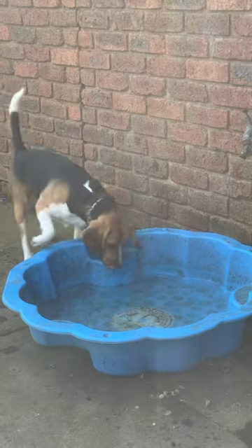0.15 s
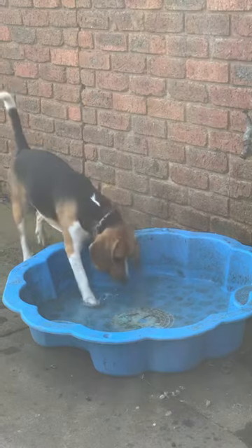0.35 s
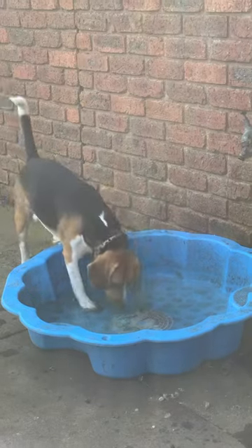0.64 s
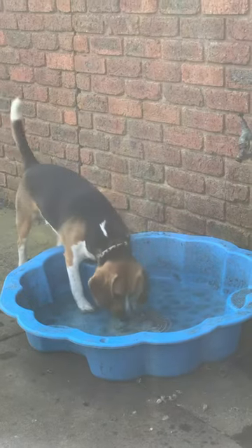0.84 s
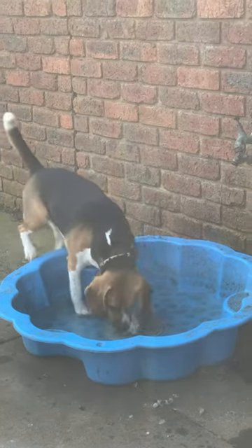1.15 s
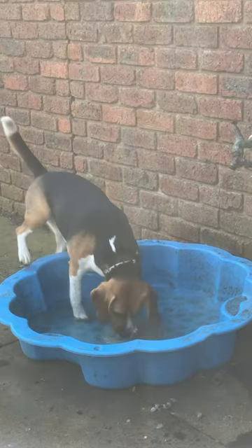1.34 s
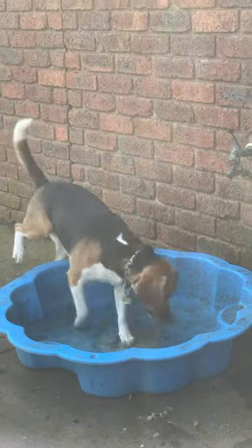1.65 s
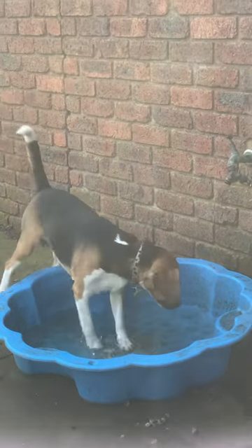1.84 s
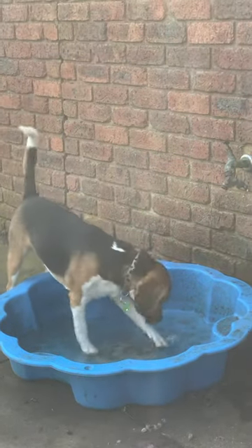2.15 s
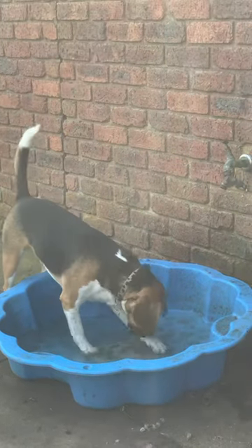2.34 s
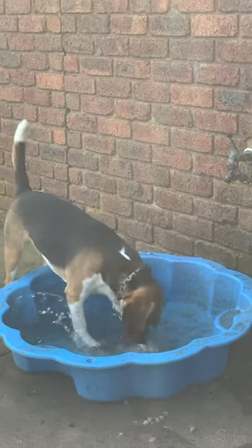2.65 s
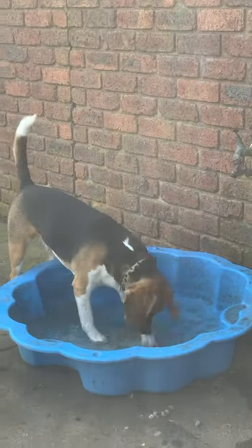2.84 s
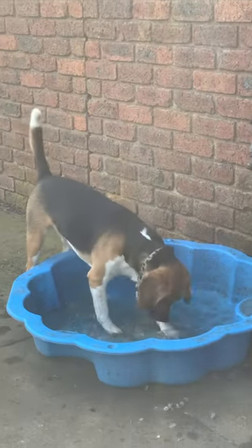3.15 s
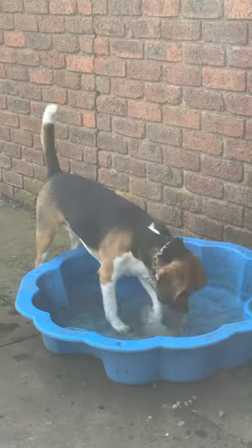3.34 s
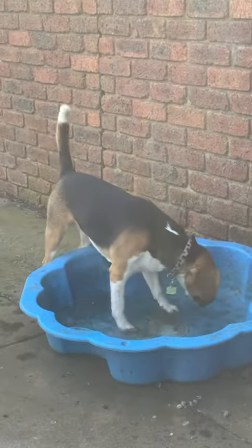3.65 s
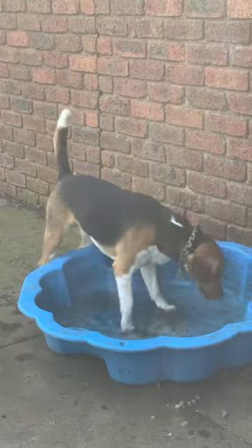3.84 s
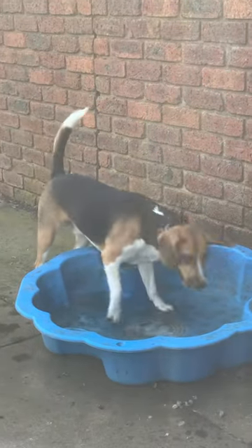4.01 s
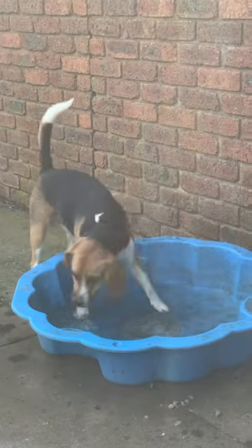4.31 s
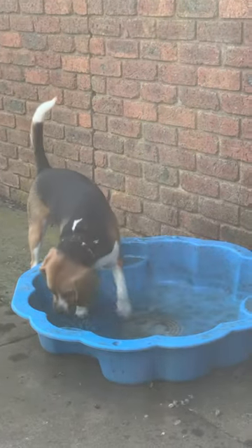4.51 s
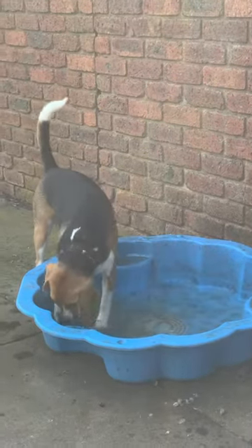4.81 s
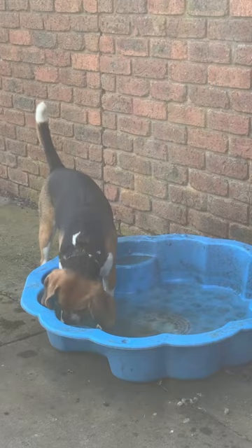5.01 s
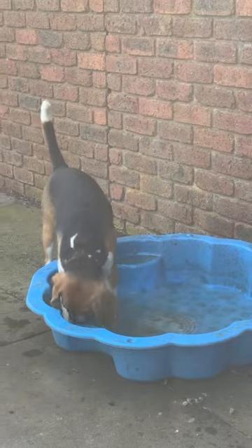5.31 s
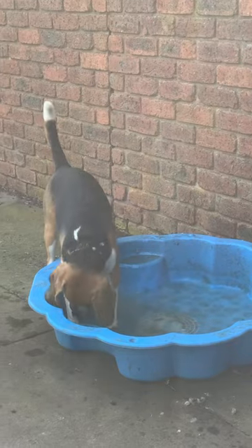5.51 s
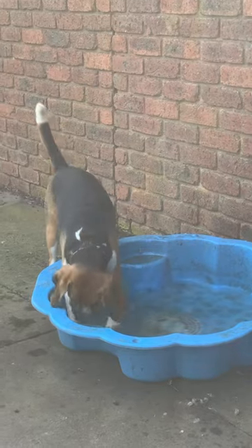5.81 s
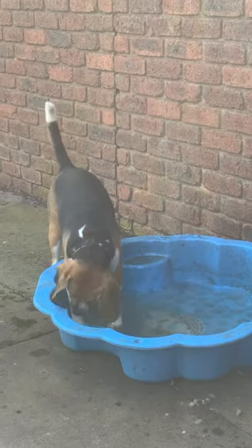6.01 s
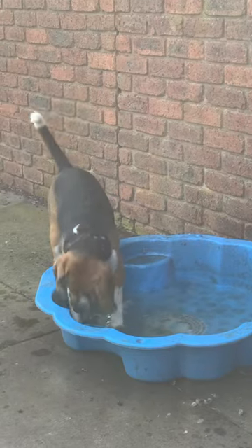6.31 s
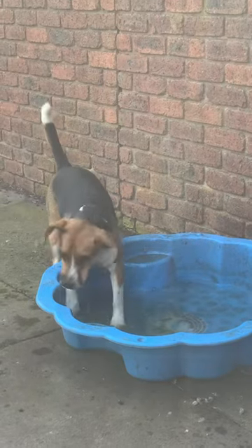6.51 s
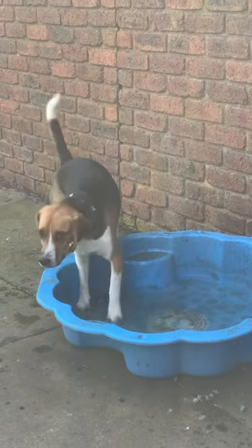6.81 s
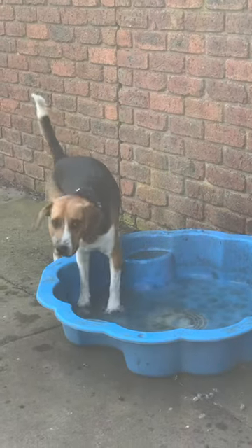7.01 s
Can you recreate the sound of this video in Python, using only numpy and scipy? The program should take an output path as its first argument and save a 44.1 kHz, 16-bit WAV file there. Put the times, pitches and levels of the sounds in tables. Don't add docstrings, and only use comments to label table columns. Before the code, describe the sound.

Irregular splashing in shallow water, heard close on a phone outdoors. At first only padded thumps on a hollow plastic floor and light ripples, then crisp paw slaps, the hardest near two and a half seconds. Busy sloshing, falling drops and bubble pops follow with brief lulls, then lower churning as the muzzle and paws work the water. A last splash fades into trickles over quiet garden rumble.

```python
import sys
import numpy as np
from scipy import signal
from scipy.fft import rfft, irfft, next_fast_len
from scipy.io import wavfile
from scipy.ndimage import uniform_filter1d, map_coordinates

SR = 44100
rng = np.random.default_rng(int(sys.argv[2]) if len(sys.argv) > 2 else 0)


def boost(x):
    u = np.asarray(x, float) / 20
    return 10 ** u


def transcribe(u):
    v = np.clip(np.atleast_2d(u).T, -1, 1)
    q = np.round(v * 32767).astype(np.int16)
    wavfile.write(sys.argv[1], SR, q)


N = 315756

# time_s, level_db
POOL_STIR = [(0, -76), (.3, -92), (.55, -82), (.88, -90), (1.15, -84), (1.36, -83), (1.75, -70),
             (2.04, -78), (2.6, -62), (2.8, -61), (3.6, -56.5), (3.8, -82), (4.2, -64.5), (4.4, -86),
             (4.6, -66), (5.4, -56), (6.4, -55.5), (7.16, -72.5)]


def unit(x):
    return x / np.sqrt(np.mean(x ** 2) + 1e-20)


def along(points, hz):
    point_hz, value = np.transpose(points)
    return np.interp(np.log(hz + 1), np.log(point_hz + 1), value)


def over_time(points):
    return np.interp(np.arange(N) / SR, *np.transpose(points))


def wobble(rate):
    knots = rng.standard_normal(int(N * rate / SR) + 4)
    return map_coordinates(knots, [np.arange(N) * rate / SR])


def filtered(x, response):
    size = next_fast_len(N + 8192)
    return irfft(rfft(x, size) * response(np.fft.rfftfreq(size, 1 / SR)), size)[..., :N]


def coloured_noise(spectrum):
    return unit(filtered(rng.standard_normal(N), lambda f: boost(along(spectrum, f))))


def modes(table):
    def response(f):
        total = 0
        for k, (hz, width, db) in enumerate(table):
            total = total + (-1) ** k * boost(db) * 1j * f * width / (hz * hz - f * f + 1j * f * width)
        return total
    return response


def bursts(times, levels_db, t60s, rise):
    power, t = np.zeros(N + SR), np.arange(SR // 2) / SR
    for s, db, t60 in zip(times, levels_db, t60s):
        shape = boost(db - 60 * t / max(t60, .004)) * (1 - np.exp(-t / rise))
        power[round(s * SR):][:len(t)] += shape ** 2
    return np.sqrt(power[:N])


def patchy(x, depth_db):
    z = signal.stft(x, nperseg=256)[2]
    field = uniform_filter1d(rng.standard_normal(z.shape), size=4, axis=0)
    field = uniform_filter1d(field, size=7, axis=1)
    return signal.istft(z * boost(depth_db * unit(field) - 0.24), nperseg=256)[1][:N]


def droplets(spectrum, centre_hz, cycles, scatter_db, share, count):
    when, pitch = rng.random(count), rng.standard_normal(count)
    size = np.minimum(rng.exponential(size=count), 2.8)
    hz = np.clip(centre_hz * np.exp(.33 * pitch), 200, 15000)[:, None]
    k = np.arange(min(int(2.5 * cycles * SR / centre_hz), 600))
    age = k * hz / (SR * cycles)
    ring = np.sin(2 * np.pi * cycles * (age + 0.0428 * age ** 2))
    ring *= np.exp(-2 * age) * (1 - np.exp(-8 * age))
    at = (when * N).astype(int)[:, None] + k
    grains = np.bincount(at.ravel(), (ring * boost(scatter_db * size)[:, None]).ravel(), N + 800)[:N]
    grains = unit(filtered(grains, lambda f: boost(along(spectrum, f))))
    share = np.clip(share, 0, 1)
    return np.sqrt(share) * grains + np.sqrt(1 - share) * coloured_noise(spectrum)


def splashing():
    # start_s, spray_peak_db, slosh_over_spray_db, t60_s
    slaps = [(0.447, -37, -13, 0.038), (0.959, -58, 0, 0.072), (1.178, -21, 4, 0.013),
             (1.19, -41.5, 3, 0.01), (1.24, -35.5, 5.5, 0.034), (1.523, -34, 15, 0.0077),
             (1.409, -68.5, 19, 0.053), (1.531, -16.5, 2, 0.013), (1.809, -43, 0.5, 0.11),
             (2.147, -47.5, -5.5, 0.09), (2.3777, -24, -6, 0.017), (2.435, -14.5, -11, 0.019),
             (2.6513, -34.5, -12, 0.041), (2.8402, -29.5, -0.5, 0.037), (2.874, -36.5, -4, 0.018),
             (3.2867, -44, 15, 0.029), (3.5, -36.5, -2, 0.015), (3.691, -39, 8.5, 0.022),
             (4.017, -41.5, -8, 0.027), (4.213, -40, 1, 0.025), (4.2448, -40.5, -16, 0.054),
             (4.664, -25.5, 6.5, 0.023), (4.903, -39, 6.5, 0.057), (5.154, -31.5, -2, 0.024),
             (5.29, -33.5, 7.5, 0.041), (5.755, -33, 4, 0.045), (5.76, -24.5, -1, 0.035),
             (6.131, -23, 5, 0.022), (6.639, -42.5, -20, 0.2), (6.697, -21, -21, 0.032),
             (6.895, -51.5, 0, 0.086), (6.99, -40, -23, 0.021), (7.004, -45, -3, 0.042),
             (6.95, -47, 4, 0.032), (3.104, -37, -16, 0.018), (5.559, -27, -4, 0.012),
             (5.298, -38, 15, 0.01), (6.783, -48, 8.5, 0.034), (6.58, -59, -7, 0.036),
             (2.661, -34.5, 5, 0.03)]
    # start_s, peak_db
    drips = [(0.3535, -46), (1.0177, -51.5), (1.732, -45), (1.7547, -34.5), (1.923, -36), (2.0767, -45),
             (2.6179, -44), (3.0118, -37), (3.23, -34.5), (3.6013, -32), (3.613, -40.5), (4.621, -30),
             (4.81, -32), (5.539, -26.5), (6.1755, -25), (6.301, -38.5), (6.367, -39), (6.579, -42.5)]
    # start_s, level_db, t60_s
    churns = [(1.4, -60, 0.28), (1.2, -52, 0.54), (5.1, -73, 0.19), (4.99, -54, .2), (4.3, -53, 0.17),
              (5.89, -44.5, 0.77), (5.5, -47, 0.3), (4.9, -54.5, 0.65), (7.1, -67, 0.13), (3.19, -49, .3),
              (2.72, -53.5, 0.6)]
    # start_s, peak_db, t60_s
    flung = [(1.752, -59, 0.074), (2.62, -55, 0.19), (2.72, -61, 0.45), (3.09, -57, 0.62),
             (3.484, -48, 0.12), (3.606, -37.5, 0.14), (4.018, -68, 0.13), (5.281, -51.5, 0.075),
             (5.527, -48, 0.19), (5.683, -54, 0.25), (6.078, -54, 0.12), (6.117, -49, 0.12),
             (6.178, -38, 0.058), (6.3, -51, 0.12), (6.42, -54, 0.31), (6.895, -56, 0.11),
             (6.991, -52.5, 0.12)]
    # pitch_hz, level_db
    slosh_colour = [(800, -10), (1150, -9), (1500, -3.5), (1950, -1), (2600, -23.5), (3500, -48.5)]
    gurgle_colour = [(250, -20), (400, -4), (700, -7), (1150, 0), (1600, -30)]
    patter_colour = [(1500, -30), (2300, -1), (3200, 0), (4200, -3), (4900, -8), (6000, -30)]
    spray_colour = [(3800, -30), (4800, -6), (5600, -2), (6500, 0), (7300, -2), (8400, -7), (10000, -30)]
    mist_colour = [(7800, -25), (9200, 0), (10400, -4), (11200, -7), (12500, -6), (14000, -17),
                   (15700, -26)]

    slosh_db, patter_db, spray_db, mist_db = wash()
    drip_slosh_db, drip_t60_s = -20, 0.038
    hits = slaps + [(*drip, drip_slosh_db, drip_t60_s) for drip in drips]
    s, db, low_db, t60 = np.transpose(hits)
    clumps_db = 1.9 * wobble(40)

    slosh = boost(slosh_db - 4.5 + clumps_db + 0.8 * wobble(25))
    slosh = np.hypot(slosh, bursts(s, db + low_db - 4.5, 2.07 * t60, rise=0.0049))
    gurgle = slosh * boost(-3.0 + 0.12 * (slosh_db + 37.0))
    gurgle = np.hypot(gurgle, boost(clumps_db) * bursts(*np.transpose(churns), rise=0.0085))
    patter = boost(patter_db - 6.5 + clumps_db + 1.3 * wobble(30))
    patter = np.hypot(patter, bursts(s, db + .5 * low_db - 10.0, 2.0 * t60, rise=0.00076))
    spray = np.hypot(boost(spray_db - 2.5 + clumps_db), bursts(s, db - 4.5, t60, rise=0.000046))
    mist = boost(mist_db - 3.5 + clumps_db + 2.9 * wobble(20))
    mist = np.hypot(mist, bursts(s, db - 17.0, 2.46 * t60, rise=0.00019))
    puffs = bursts(*np.transpose(flung), rise=0.003) * boost(0.5 + clumps_db)

    puff_noise = unit(filtered(rng.standard_normal(N), lambda f: modes([(13800, 5000, 0)])(f) ** 2))
    return (slosh * droplets(slosh_colour, centre_hz=1467, cycles=12, scatter_db=2.8, share=0.6, count=1500)
            + gurgle * droplets(gurgle_colour, centre_hz=826.7, cycles=20.6, scatter_db=-0.5,
                                share=0.56, count=900)
            + patter * droplets(patter_colour, centre_hz=3218, cycles=25, scatter_db=5, share=0.4, count=2400)
            + spray * droplets(spray_colour, centre_hz=6275, cycles=30, scatter_db=3, share=0.45, count=3600)
            + mist * droplets(mist_colour, centre_hz=13460, cycles=45, scatter_db=6.0, share=0.49, count=9000)
            + puffs * puff_noise)


def wash():
    # start_s, spray_db, slosh_over_spray_db, patter_over_spray_db, t60_s
    plunges = [(1.19, -51, 10.5, 1, 0.25), (1.415, -66.5, 8, 5, 0.72), (1.72, -57.5, -5, 8.5, 0.4),
               (2.383, -47, 6.5, 1, 0.27), (2.444, -29, -2.5, 4.5, 0.21), (2.621, -43.5, -33, -5.5, 0.79),
               (2.706, -40, -16, -4, 0.5), (3.507, -38.5, -8.5, -6, 0.18), (4.029, -52, -14, 0.5, 0.25),
               (4.47, -64.5, -2, -1, 1), (4.628, -46, -32, 8.5, 0.21), (4.668, -56, 16.5, 20, 0.042),
               (4.912, -53, -4, 8, 0.14), (5.302, -51, 13, 8, 0.2), (5.761, -41, -14, 1, 0.34),
               (6.138, -37.5, 3.5, 4, 0.18), (6.181, -46, 7, 1.5, 0.15), (6.64, -58, 11, 3, 0.092),
               (6.702, -31.5, -8, 0, 0.13)]
    # peak_s, spray_db, slosh_over_spray_db, patter_over_spray_db, t60_s
    sweeps = [(0.124, -45, -8.5, -2.5, 0.31), (0.443, -57.5, -2, -2, 0.35), (1.531, -55.5, 5.5, 2, 0.28),
              (1.832, -50, -15, -1.5, 0.27), (1.917, -56.5, -27, 5.5, 0.25),
              (2.256, -67.5, 13.5, 10.5, 0.23), (2.676, -43.5, -1, 7, 0.088), (2.88, -34.5, 0, 8, 0.15),
              (3.318, -32, -3.5, 4.5, 0.12), (5.557, -35, -1, 8, 0.1), (3.144, -36, -8.5, -0.5, 0.25),
              (3.609, -44.5, -6.5, -2, 0.27), (3.863, -56, -8, -7.5, 0.2), (3.936, -66, 9.5, 6.5, 0.27),
              (4.227, -65, 11, -24, 0.34), (4.756, -45, 3, 1.5, 0.13), (5.01, -50, -9, -11, 0.11),
              (5.159, -41.5, 2, 7, 0.13), (5.698, -50, -4.5, 2.5, 0.46), (5.93, -65, 16.5, 11, 0.3),
              (1.5, -69, 2, -5, 0.3), (6.043, -47.5, 5.5, 10.5, 0.17), (6.351, -42, -12.5, 1, 0.13),
              (6.47, -47, -3, 0, 0.25), (7.02, -54, -12, 0.5, 0.29), (6.95, -65.5, 3, 6, 0.32),
              (2.25, -61, 4, 8, 0.13)]

    s, spray_db, slosh_db, patter_db, t60 = np.transpose(plunges + sweeps)[..., None]
    is_plunge = np.arange(len(s))[:, None] < len(plunges)
    rise = np.where(is_plunge, 0.053, 1.085 * t60)
    t = np.arange(0, N / SR, 1 / 500)
    stir_db = np.interp(t, *np.transpose(POOL_STIR))

    def layer(peak_db, fall, still_db):
        strokes = boost(peak_db - 60 * np.maximum((t - s) / fall, (s - t) / rise)) ** 2
        power = strokes.sum(axis=0) + boost(stir_db + still_db) ** 2
        return np.interp(np.arange(N) / SR, t, 10 * np.log10(power))

    mist_db = spray_db - 9.5 - 0.26 * patter_db
    return (layer(spray_db + slosh_db, 1.065 * t60, still_db=-3),
            layer(spray_db + patter_db, t60, still_db=0.5),
            layer(spray_db, t60, still_db=-0.3),
            layer(mist_db, 1.07 * t60, still_db=-10.0))


def bubbles():
    # start_s, pitch_hz, level_db, t60_s
    trapped = [(5.325, 1730, -51, 0.045), (1.709, 6030, -42, 0.012), (1.721, 1970, -57, 0.031),
               (1.874, 1480, -51, 0.023), (2.155, 2910, -64.5, 0.065), (2.282, 1030, -51.5, 0.023),
               (2.618, 6300, -59, 0.017), (2.669, 1130, -51.5, 0.057), (2.759, 1990, -41.5, 0.02),
               (2.917, 1730, -57, 0.071), (3.149, 3070, -62, 0.053), (3.195, 580, -45.5, 0.032),
               (3.461, 6860, -42, 0.0063), (3.646, 1870, -47, 0.013), (3.658, 3430, -46.5, 0.0078),
               (3.008, 575, -69.5, 0.097), (4.137, 5960, -53.5, 0.021), (4.75, 1490, -45.5, 0.029),
               (4.909, 1016, -42.5, 0.032), (5.293, 1030, -38, 0.033), (5.796, 6800, -49, 0.041),
               (6.117, 3080, -50, 0.015), (6.133, 1380, -35.5, 0.034), (6.343, 3270, -41, 0.027),
               (6.426, 1475, -60.5, 0.16), (6.487, 1800, -44.5, 0.015), (6.727, 1060, -36.5, 0.0093),
               (6.808, 3290, -51, 0.039), (6.951, 1817, -65.5, 0.096)]
    # start_s, pitch_hz, level_db, t60_s
    more_bubbles = [(1.178, 1447, -42, 0.044), (1.191, 1210, -40, 0.03), (1.531, 4400, -32, 0.011),
                    (5.461, 1500, -52, .03), (1.528, 1087, -54, 0.043), (1.555, 1910, -63, 0.029),
                    (2.433, 2580, -39, .02), (2.45, 3630, -42, 0.035), (2.45, 4020, -42, 0.084),
                    (2.454, 1805, -52, .05), (2.464, 1156, -53, 0.06), (2.575, 2100, -68, .04),
                    (2.622, 2730, -65, 0.049), (2.764, 1535, -50, 0.032), (2.872, 3780, -41, 0.071),
                    (2.891, 1755, -45.5, 0.043), (3.055, 936, -67, 0.053), (3.103, 3480, -46.5, 0.03),
                    (3.121, 1860, -53.5, 0.046), (3.139, 1580, -51, 0.052), (3.155, 1020, -47.5, 0.029),
                    (3.209, 1970, -51.5, 0.024), (3.23, 2970, -62, .04), (3.285, 1640, -47, 0.029),
                    (3.308, 2037, -47, 0.063), (3.347, 1500, -50, 0.029), (3.539, 2020, -52.5, 0.038),
                    (3.592, 1880, -55, 0.025), (3.692, 1116, -52, 0.035), (4.212, 1326, -56, 0.034),
                    (4.667, 1060, -42, 0.032), (4.669, 524, -48, 0.035), (1.814, 1510, -52.5, .025),
                    (1.828, 1390, -52.5, .025), (6.645, 342, -45, 0.037), (6.463, 2020, -52.5, .03),
                    (4.914, 1465, -49, 0.05), (5.158, 2450, -48, 0.05), (5.161, 1970, -48, 0.024),
                    (5.165, 1510, -47.5, 0.029), (5.297, 1850, -43, 0.038), (5.463, 3360, -56, 0.027),
                    (5.558, 1505, -42, 0.027), (5.559, 997, -45, 0.027), (5.685, 2090, -51, 0.044),
                    (5.698, 990, -56.5, 0.064), (5.761, 964, -40, 0.025), (5.822, 1100, -60, 0.055),
                    (5.912, 956, -65, 0.034), (5.96, 398, -52, 0.038), (6.047, 1146, -52, 0.037),
                    (6.637, 867, -54, 0.044), (6.781, 1586, -53.5, 0.018)]
    # start_s, from_hz, to_hz, level_db, length_s
    gulps = [
        (4.249, 600, 1400, -42, .052),
        (4.268, 760, 1050, -50, .04),
        (3.5, 900, 1550, -46, .045),
        (3.905, 1200, 1800, -55, .05),
        (4.748, 1200, 2500, -48, .035),
        (5.318, 1400, 2300, -47, .025),
        (5.962, 100, 112, -32, .045),
        (6.155, 112, 104, -33, .05),
        (5.32, 104, 110, -38, .05),
        (6.735, 66, 74, -36, .05),
    ]

    out, t = np.zeros(N + SR), np.arange(SR // 8) / SR
    for s, hz, db, t60 in trapped + more_bubbles:
        phase = 2 * np.pi * hz * (.98 * t + 0.08 * t * t / t60)
        ring = boost(db + 16.0 - 60 * t / t60) * (1 - np.exp(-t / 0.001)) * np.sin(phase)
        out[round(s * SR):][:len(t)] += ring
    out[:N] *= .9 + .3 * wobble(120)
    for s, from_hz, to_hz, db, length in gulps:
        glide = to_hz + (from_hz - to_hz) * np.exp(-1.4 * t / length)
        shape = np.sin(np.pi * np.clip(t / length, 0, 1) ** 0.45)
        out[round(s * SR):][:len(t)] += boost(db) * shape * np.sin(2 * np.pi * np.cumsum(glide) / SR)
    return out[:N]


def ticks():
    # start_s, peak_db, pitch_hz
    drops = [(1.111, -49, 7850), (1.5304, -20, 7600), (1.827, -38, 7240), (1.8862, -32, 6600),
             (1.903, -44, 6750), (1.9215, -46, 7140), (2.6517, -33, 7060), (2.6883, -28, 6070),
             (2.7053, -21, 6200), (2.8411, -30.5, 3734), (2.8739, -27.5, 3720), (3.1944, -33, 4140),
             (3.4845, -40, 6900), (3.5007, -32, 6700), (3.5312, -32, 8100), (3.619, -30, 9430),
             (4.6312, -31.5, 3800), (4.9294, -39, 3830), (5.649, -39, 7600), (6.3444, -31, 3360),
             (6.5824, -41, 6700), (6.7844, -39, 3160)]
    out, t = np.zeros(N + SR), np.arange(SR // 50) / SR
    crack = boost(-60 * t / .0012)
    ring = boost(-11 - 60 * t / .008)
    for s, db, hz in drops:
        out[round(s * SR):][:len(t)] += boost(db + 2.0) * (crack + ring) * np.sin(2 * np.pi * hz * t)
    return out[:N]


def swishing():
    # start_s, level_db, length_s
    drags = [
        (0.43, -67, 0.28),
        (0.881, -62, 0.23),
        (4.465, -64, 0.14),
        (1.977, -63, 0.21),
    ]
    t = np.arange(N) / SR
    swell = sum(boost(db) * np.sin(np.pi * np.clip((t - s) / length, 0, 1)) for s, db, length in drags)
    return swell * unit(filtered(rng.standard_normal(N), modes([(1520, 280, 0)])))


def pool():
    # start_s, peak_db, wall_knock_db, t60_s
    steps = [(0.089, -26, -17, 0.3), (0.442, -46.5, -12, 0.23), (0.619, -24.5, -14, 0.16),
             (1.039, -32, -14, 0.12), (1.184, -26.5, -10, 0.34), (1.412, -41.5, -6.5, 0.85),
             (1.837, -30.5, -15.5, 0.23), (2.38, -52.5, 7, 0.37), (2.448, -38, 2.5, 0.26),
             (2.674, -37.5, -2.5, 0.45), (2.846, -45, 3, 0.13), (3.155, -31, -6, 0.56),
             (3.592, -53, 5.5, 0.26), (4.225, -53, -1.5, 0.42), (3.816, -48.5, -23, 0.39),
             (4.668, -32.5, -8, 0.36), (5.322, -35, -55, 0.21), (5.451, -32.5, -19, 0.31),
             (5.766, -36, -20, 0.95), (5.86, -51, -14, 0.59), (5.893, -32, -9, 0.092),
             (5.915, -25.5, -19, 0.47), (6.005, -29.5, -16, 0.12), (6.133, -22.5, -9, 0.16),
             (6.226, -38, -20, 0.25), (6.644, -32.5, -10, 0.28), (6.736, -29.5, -12.5, 0.12)]
    # pitch_hz, width_hz, level_db
    floor_modes = [(66, 8.7, -13), (107, 29, -7.5)]
    # pitch_hz, width_hz, level_db
    wall_modes = [(195.6, 50, -6.5), (243, 47, 2), (338, 43, 2.5), (372.4, 113, -2.5)]

    def soft(f):
        return (f / 50) ** 2 / (1 + (f / 50) ** 2) / (1 + (f / 450) ** 4)

    s, db, knock_db, t60 = np.transpose(steps)
    boom = filtered(rng.standard_normal(N), lambda f: modes(floor_modes)(f) * soft(3 * f) * soft(f))
    knock = filtered(rng.standard_normal(N), lambda f: modes(wall_modes)(f) * soft(f))
    return (unit(boom) * bursts(s, db - 6.0, t60, rise=0.033)
            + unit(knock) * bursts(s, db + knock_db + 3.0, 0.68 * t60, rise=0.0035))


def yard(x):
    # pitch_hz, t60_s
    echo_t60 = [(300, 0.26), (10000, 0.082)]
    hz, t, z = signal.stft(rng.standard_normal(SR // 3), SR, nperseg=256)
    fade = boost(-60 * t / along(echo_t60, hz)[:, None])
    tail = signal.istft(z * fade, SR, nperseg=256)[1]
    delayed = np.pad(x, (220, 0))
    return signal.fftconvolve(delayed, tail / np.linalg.norm(tail))[:N]


def garden():
    # time_s, rumble_db
    hum = [(0, -58.5), (.48, -53.5), (1, -62), (1.37, -54.5), (2.2, -63.5), (2.75, -56.5), (3.4, -59),
           (4.2, -57.5), (4.4, -67), (4.62, -67), (4.87, -55.5), (5.76, -55.5), (6.04, -62), (6.4, -57.5),
           (7.16, -57.5)]
    # pitch_hz, level_db
    rumble_colour = [(15, -67), (35, -7.5), (65, 0), (110, -6.5), (170, -18), (300, -51)]
    murmur_colour = [(90, -35.5), (200, 3.5), (330, 0), (480, -11.5), (1500, -13), (2500, -46)]
    hiss_colour = [(800, -2), (2000, -18), (4200, -12.5), (7000, -3.5), (8200, -9.5), (13200, 3),
                   (14200, -23)]

    rumble_db, stir_db = over_time(hum), over_time(POOL_STIR)
    murmur_db = rumble_db - 10.5 + 0.093 * (stir_db + 65.5)
    rumble = boost(rumble_db + 2.45 * wobble(8.7)) * coloured_noise(rumble_colour)
    murmur = boost(murmur_db + 2.0 + 3.6 * wobble(8.2)) * coloured_noise(murmur_colour)
    hiss = boost(-82.0 + 2.5 * wobble(12)) * patchy(coloured_noise(hiss_colour), depth_db=3.0)
    return rumble + murmur + hiss


def scene():
    # pitch_hz, lead_rad
    lead = [(30, 0), (600, -.8), (1500, .3), (3000, 2), (4300, 1.9), (4950, 2.9), (5550, 3.4), (7600, 6.1),
            (9400, 6.45), (11200, 9.3), (13600, 9.5), (14800, 12.4)]
    # pitch_hz, likeness (0-1)
    alike = [(40, .99), (90, .965), (330, .985), (700, .75), (1600, .88), (3000, .65), (4300, .65),
             (4800, .992), (14400, .96)]
    # pitch_hz, left_minus_right_db
    lean = [(100, -1.3), (350, -.3), (750, -4.5), (1400, -2), (2500, -2), (5000, 0)]

    near = patchy(splashing(), depth_db=1.6) + swishing() + bubbles() + pool() + ticks()
    shared = near + boost(-10.0) * yard(near) + garden()
    z = signal.stft(shared, nperseg=256)[2]
    scrambled = z * np.exp(2j * np.pi * rng.random(z.shape))
    other = 1.5 * signal.istft(scrambled, nperseg=256)[1][:N]
    side = np.array([[1], [-1]])

    def turn(f):
        return np.arccos(np.clip(along(alike, f), 0, 1)) / 2

    def port(f):
        return boost(side * along(lean, f) / 2) * np.exp(.5j * side * np.interp(f, *np.transpose(lead)))

    return (filtered(shared, lambda f: port(f) * np.cos(turn(f)))
            + filtered(other, lambda f: side * port(f) * np.sin(turn(f))))


def roll_off(x):
    return signal.sosfilt(signal.butter(12, 16520, fs=SR, output="sos"), x)


def record(dry):
    banded = filtered(dry, lambda f: (f < 15830) * f ** 4 / (f ** 4 + 43.0 ** 4))
    mix = banded / (1 + (banded / .3) ** 4) ** .25
    return roll_off(mix)


dry = scene()
out = record(dry)
transcribe(out)
```